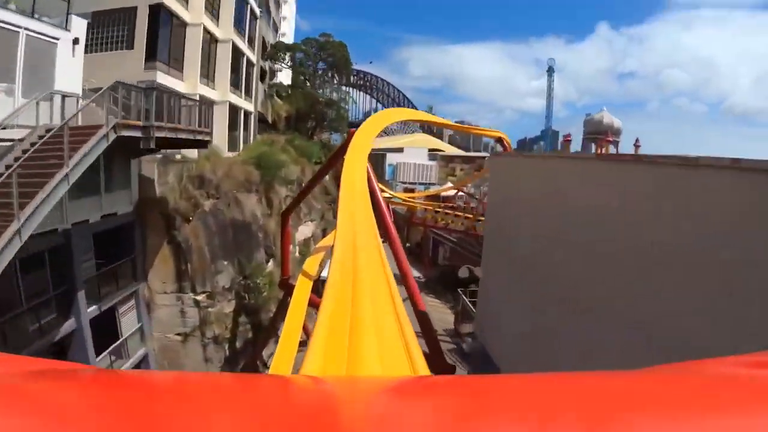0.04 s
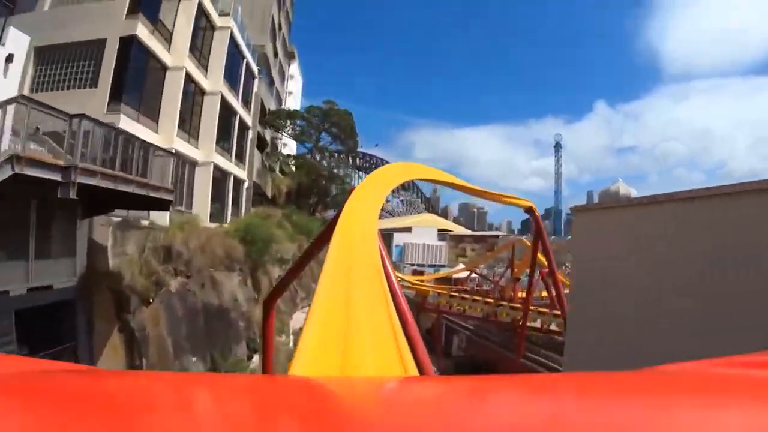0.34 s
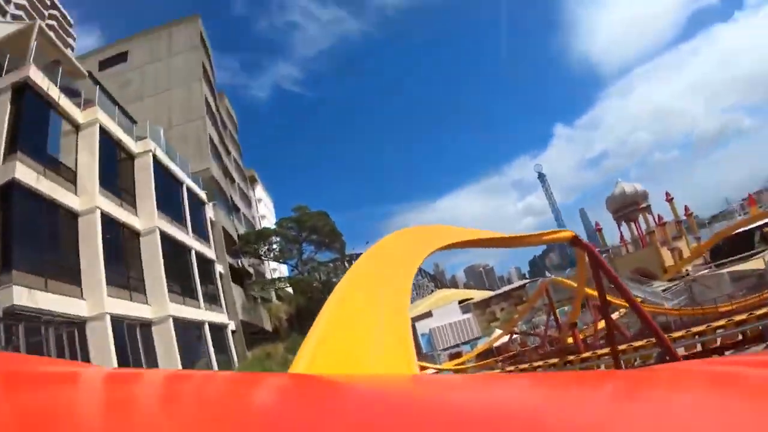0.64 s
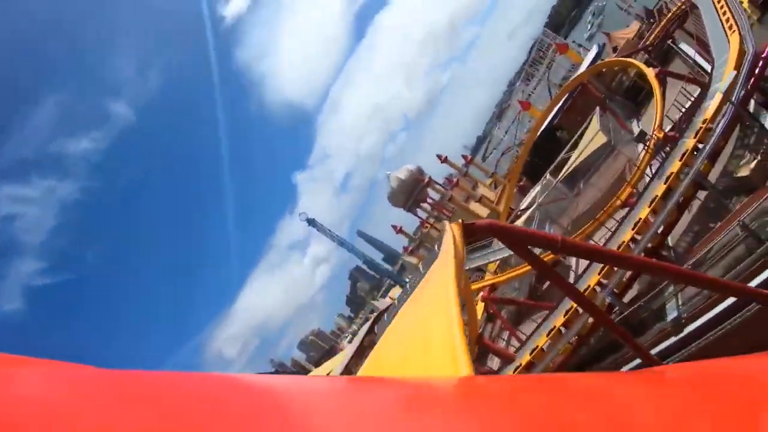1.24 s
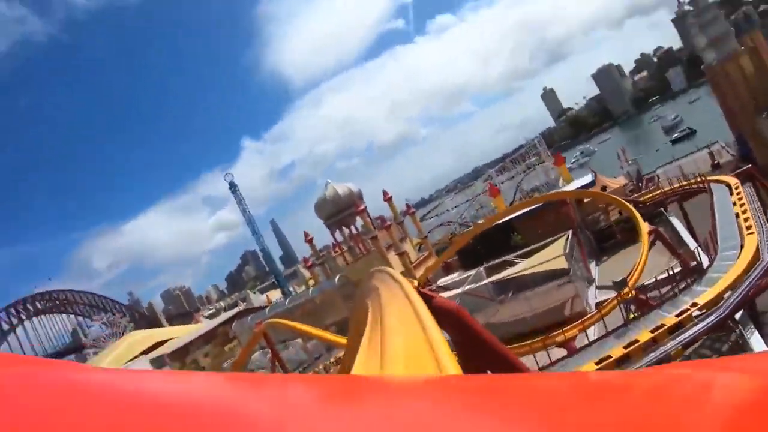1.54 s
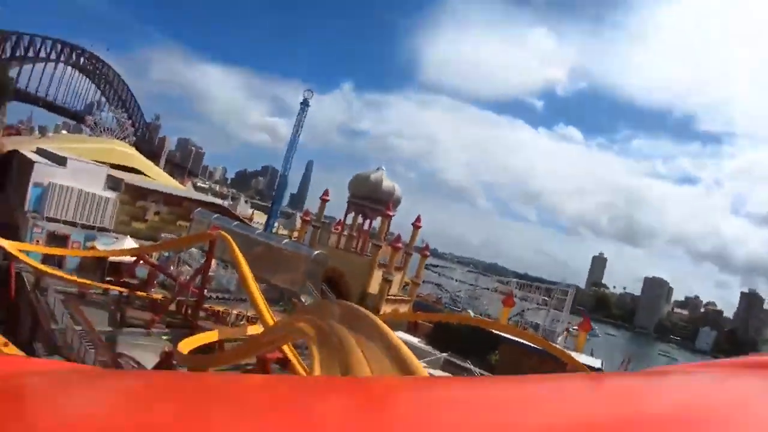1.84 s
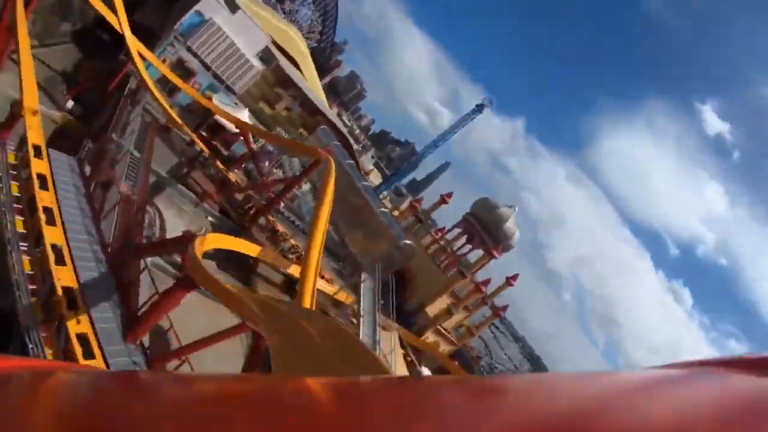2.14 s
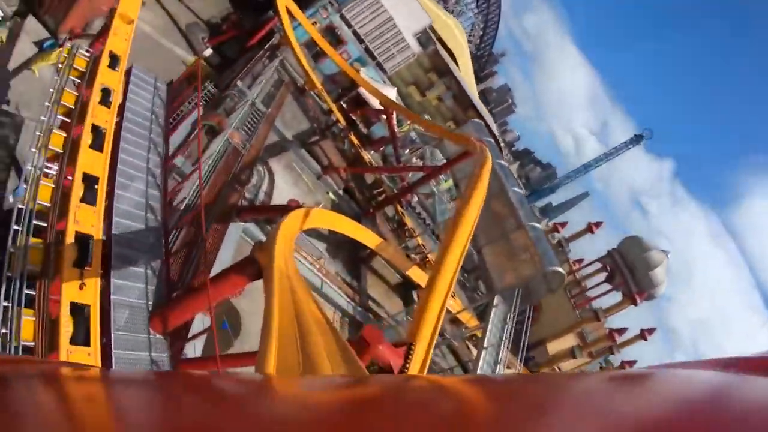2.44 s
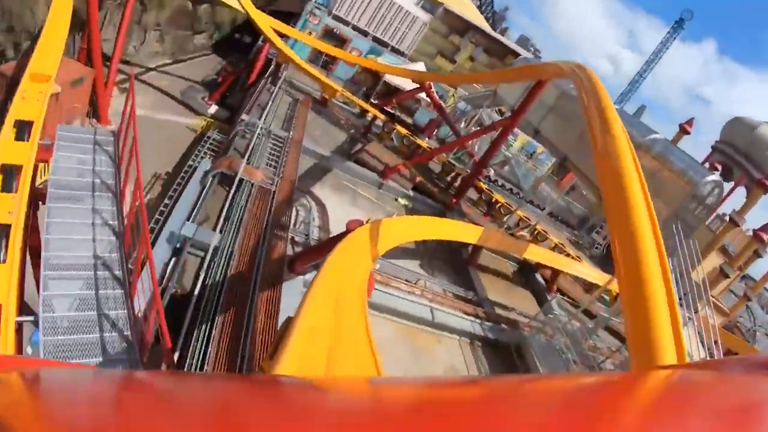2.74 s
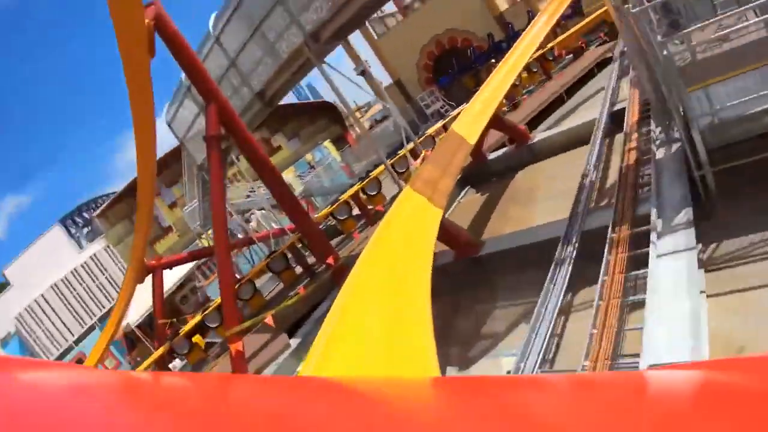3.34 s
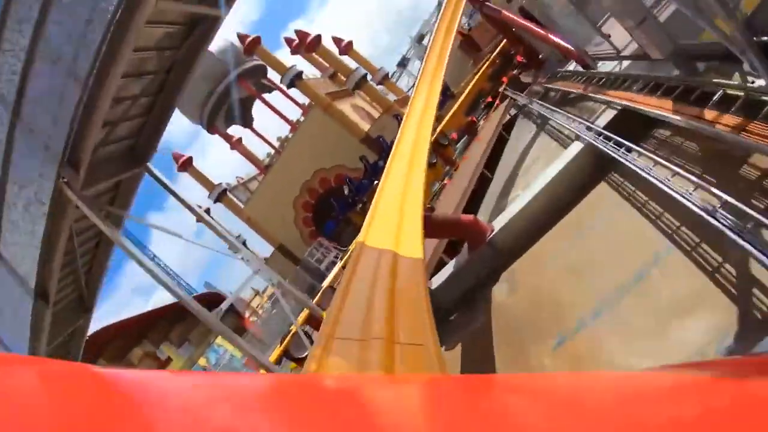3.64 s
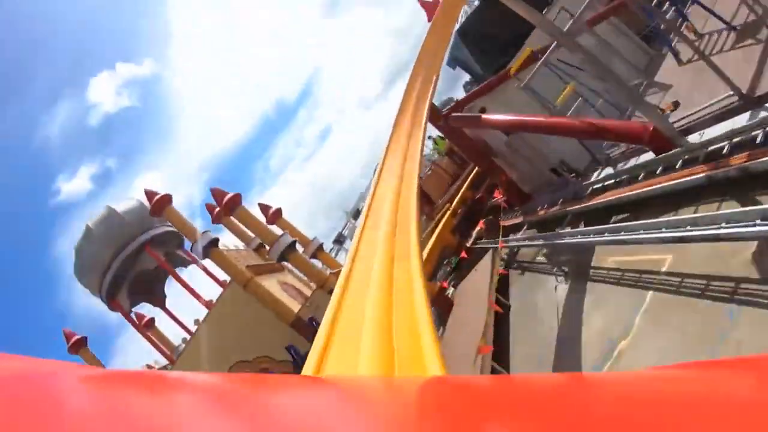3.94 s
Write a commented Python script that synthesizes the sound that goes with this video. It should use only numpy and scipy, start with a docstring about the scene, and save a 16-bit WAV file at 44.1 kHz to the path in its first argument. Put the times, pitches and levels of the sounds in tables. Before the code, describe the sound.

Deep, continuous wind buffets a microphone riding outdoors on a roller coaster's nose. The car drones and bumps over the track with a quieter wheel roar and hiss, while brief, light rattles come and go.

```python
"""Wind buffets a microphone on the nose of a roller coaster car running through banked turns.
Turbulent eddies make the rumble, gusts and slaps. The track drives the resonances of the hollow body,
which booms and thumps; the wheels roar and hiss on the rough rail. A loose fitting chatters in short
bursts of impacts, and a few thin ticks sound above it. A limiter holds the rumble down."""
import sys
import numpy as np
from scipy import signal
from scipy.fft import rfft, irfft
from scipy.io import wavfile
from scipy.ndimage import uniform_filter1d, minimum_filter1d

SR = 44100
rng = np.random.default_rng(int(sys.argv[2]) if len(sys.argv) > 2 else 0)


def wrap_up_sound(samples):
    """Save the sound to the file named by the first command line argument, as 16-bit audio."""
    columns = np.atleast_2d(samples).T
    # keep every value between -1 and 1, then stretch to whole-number steps
    tamed = np.clip(columns, -1, 1)
    steps = np.round(tamed * 32767).astype(np.int16)
    wavfile.write(sys.argv[1], SR, steps)


N = 176400


def wind():
    """Turbulent pressure fluctuation: large eddies rumble on the microphone, smaller ones flutter."""
    # envelopes of the rumble and of the low-mid and mid gusts (time [s], level [dB])
    rumble_levels = [(0, -13.5), (.27, -23.5), (.42, -17.5), (.72, -12.5), (.79, -18), (.83, -13),
                     (1.28, -11.5), (1.45, -16.5), (1.57, -15.5), (1.71, -18), (1.82, -17), (2.2, -16),
                     (2.45, -15), (2.68, -14), (3.32, -13), (3.54, -19.5), (3.58, -13.5), (3.73, -19.5),
                     (3.85, -9), (4, -23)]
    low_levels = [(0, -34), (.44, -37.5), (.5, -31.5), (.62, -42.5), (1.15, -34.5), (1.44, -32.5),
                  (1.53, -28.5), (1.8, -39.5), (1.95, -30.5), (2.08, -40), (2.16, -23.5), (2.27, -35),
                  (2.78, -37.5), (3.1, -33.5), (3.29, -25), (3.34, -32.5), (3.44, -24.5), (3.5, -29),
                  (3.6, -26.5), (3.75, -34), (4, -28)]
    mid_levels = [(0, -40.5), (.4, -46), (.9, -41.5), (1.44, -43.5), (1.54, -35), (1.68, -49), (1.76, -37),
                  (1.84, -42), (1.9, -31), (1.96, -36), (2.02, -30), (2.07, -34.5), (2.16, -29.5),
                  (2.21, -34.5), (2.26, -31.5), (2.4, -36), (2.48, -41), (2.95, -41), (3.25, -39.5),
                  (3.41, -36), (3.5, -41.5), (3.66, -37), (3.82, -34), (4, -48)]
    # spectra of the same three bands (frequency [Hz], spectral level [dB])
    rumble_spectrum = [(15, -18.5), (25, -13.5), (38, -8.5), (50, -4.5), (64, 1), (87, 2.5), (102, -7),
                       (150, -26.5), (400, -44)]
    low_spectrum = [(130, -20.5), (220, -5), (280, 2.5), (350, -1.5), (440, -15), (600, -20), (1200, -43.5)]
    mid_spectrum = [(250, -20.5), (390, 3.5), (490, 1.5), (620, -2.5), (800, -7.5), (1050, -17),
                    (1600, -22), (4000, -50.5)]
    rumble = steady(noise(rumble_spectrum), span_s=0.27) * envelope(rumble_levels)
    flutter = fluctuation(rate_hz=22)
    low = steady(noise(low_spectrum) * undb(1.5 * flutter), span_s=0.043) * envelope(low_levels)
    mid = steady(noise(mid_spectrum) * undb(2 * flutter), span_s=0.072) * envelope(mid_levels)
    return undb(2.5) * rumble + low + undb(-0.83) * mid


def wind_slaps():
    """Pressure transients: single eddies burst on the microphone."""
    # eddy arrivals (time [s], level [dB])
    eddies = [(1.543, -1.5), (1.641, -6), (2.156, 3.5), (3.533, 2), (3.646, 0.5)]
    air = resonant_noise([(304, 316, 0)], span_s=0.083)
    return undb(-20.5) * air * bursts(eddies, attack_s=0.0044, decay_s=0.01)


def body_boom():
    """Forced vibration: the track shakes the hollow body at random, and its resonances respond."""
    # body resonances (frequency [Hz], stage bandwidth [Hz], gain [dB])
    modes = [(124.4, 28.5, 1.5), (195.5, 51.7, -0.5), (325, 61, -15.5)]
    # envelopes of the lowest resonance and of the upper two (time [s], level [dB])
    boom_levels = [(0, -22), (.2, -21.5), (.4, -32), (.54, -10.5), (.64, -18), (.76, -25), (.83, -18.5),
                   (.96, -30), (1.15, -15), (1.26, -24), (1.39, -13), (1.65, -22.5), (1.75, -16.5),
                   (1.83, -26.5), (2.08, -20), (2.16, -17.5), (2.8, -21), (3.05, -22), (3.46, -19.5),
                   (3.55, -21), (3.64, -28), (3.73, -13.5), (3.86, -32), (4, -16.5)]
    drone_levels = [(0, -31.5), (.2, -33.5), (.42, -29.5), (.54, -27), (.72, -21), (.8, -27.5), (1.26, -25),
                    (1.42, -42), (1.54, -30.5), (1.9, -29.5), (2.24, -24.5), (2.66, -27), (3.1, -27.5),
                    (3.24, -22.5), (3.38, -20), (3.5, -32), (3.64, -31), (3.73, -20), (3.9, -28.5)]
    boom = resonant_noise(modes[:1], span_s=0.12) * envelope(boom_levels)
    drone = resonant_noise(modes[1:], span_s=0.11) * envelope(drone_levels)
    return undb(0.5) * boom + drone


def body_thumps():
    """Damped free vibration: the body rings down after each jolt from uneven track."""
    # jolts (time [s], level [dB])
    jolts = [(.488, -6.5), (.532, 0), (1.527, -2.5), (2.152, 0.5), (3.533, 5)]
    # body modes (frequency [Hz], 60 dB decay time [s], level [dB])
    modes = [(128.6, 0.17, -2), (199.5, 0.15, -5.5), (330.5, 0.085, -8)]
    return undb(-5) * struck(jolts, modes, contact_s=0.0094)


def wheels():
    """Roughness excitation: rolling contact with the rail modulates a roar and a hiss together."""
    # envelopes of the wheel roar and the rail hiss (time [s], level [dB])
    roar_levels = [(0, -50), (.15, -55), (.6, -46), (.73, -52.5), (.88, -45.5), (1.08, -52), (1.3, -44.5),
                   (1.44, -50.5), (1.56, -43), (1.7, -47.5), (2.2, -46.5), (2.57, -44), (2.78, -48),
                   (3.05, -48), (3.3, -44.5), (3.58, -49), (3.78, -42.5), (4, -46.5)]
    hiss_levels = [(0, -64.5), (.2, -69.5), (.5, -63), (.9, -59), (1.12, -58.5), (1.3, -58.5), (1.55, -56),
                   (1.7, -62.5), (2.3, -57.5), (2.6, -58), (2.78, -59.5), (3.05, -59), (3.3, -57),
                   (3.75, -56), (4, -59)]
    # their spectra (frequency [Hz], spectral level [dB])
    roar_spectrum = [(400, -23), (800, 3.5), (1100, 1), (1450, 1.5), (1850, -2), (2300, -4), (2800, -6.5),
                     (3600, -12.5), (4200, -14), (6000, -45)]
    hiss_spectrum = [(2500, -10.5), (3700, 2), (4200, -7), (4700, -1), (5600, -3.5), (6500, -5.5),
                     (7200, -11.5), (8000, -21.5), (9500, -29.5), (12000, -44.5)]
    roughness = undb(1.05 * fluctuation(rate_hz=40))
    roar = undb(2) * noise(roar_spectrum) * envelope(roar_levels)
    hiss = undb(3) * noise(hiss_spectrum) * envelope(hiss_levels)
    return roughness * (roar + hiss)


def loose_fitting():
    """Impact excitation: knocks, clacks and faint random chatter ring the modes of a loose fitting."""
    # knocks (time [s], level [dB], treble offset [dB])
    knocks = [(0.208, -13, -6), (1.112, -6, -3), (1.199, -9, 5), (1.235, -10.5, 4.5), (1.329, -1.5, 3),
              (1.345, -6, 7), (1.352, -4.5, -4), (1.362, -4, 6.5), (1.590, -7, -8), (2.249, -3.5, -6),
              (2.330, -6, -2), (2.838, -5.5, -6), (2.861, -4.5, 1), (3.258, -17, 14), (3.280, -7, -1.5),
              (3.293, -3.5, 8), (3.309, -1.5, 2.5), (3.356, -0.5, -1.5), (3.370, -2, 2), (3.377, 0, -6),
              (3.385, -2, -6), (3.452, -6, 1), (3.468, -14, -4), (3.482, -4.5, -6), (3.8536, 6, -2),
              (3.8695, 4.5, -2), (3.883, -2, 0), (3.899, -9, -2)]
    # harder clacks of metal on metal (time [s], level [dB])
    clack_hits = [(0.209, -16), (1.346, -5), (1.352, -2.5), (1.362, -6), (3.377, -5.5)]
    # envelope of the chatter between knocks (time [s], level [dB])
    chatter_levels = [(0, -30.5), (1.1, -27), (1.35, -20.5), (1.7, -15), (3.1, -20), (3.35, -14),
                      (3.62, -12), (3.85, -6), (4, -20.5)]
    # broad resonances of the fitting (frequency [Hz], stage bandwidth [Hz], gain [dB])
    low_modes = [(1796, 620, 2), (3640, 1200, -20.5)]
    high_modes = [(4800, 210, -0.5), (5440, 1100, -2.5), (6070, 800, -2)]
    clack_modes = [(3050, 1700, 2), (3850, 340, 1.8)]
    # its clear notes (frequency [Hz], 60 dB decay time [s], level [dB])
    ping_modes = [(1790, 0.018, 2), (2066, 0.026, -5.5)]
    attack_s, decay_s, taps_per_s = 0.001, 0.0028, 60
    when, strength = rng.random((int(taps_per_s * N / SR), 2)).T
    taps = zip(when * N / SR, -0.8 * np.log(np.maximum(strength, 0.05)))
    chatter = bursts(taps, attack_s, decay_s) * envelope(chatter_levels)
    low_hits = [(time, db) for time, db, _ in knocks]
    high_hits = [(time, db + treble_db) for time, db, treble_db in knocks]
    low = resonant_noise(low_modes) * (chatter + undb(-4.5) * bursts(low_hits, attack_s, decay_s))
    pings = struck(low_hits, ping_modes, contact_s=attack_s)
    high = resonant_noise(high_modes) * (undb(-7.5) * chatter + bursts(high_hits, attack_s, decay_s))
    clacks = resonant_noise(clack_modes) * bursts(clack_hits, attack_s, decay_s=0.0017)
    rattle = undb(-29.5) * low + undb(-39.5) * high + undb(-29) * pings + undb(-33) * clacks
    return signal.sosfilt(signal.butter(4, 7000, fs=SR, output="sos"), rattle)


def ticks():
    """Amplitude modulation: very short pulses of treble noise are heard as thin ticks in a brief fizz."""
    # tick onsets and the envelope of the fizz (time [s], level [dB])
    onsets = [(1.563, -2), (1.574, 2), (1.579, 0), (1.611, 0)]
    fizz_levels = [(1.53, -105), (1.565, -77), (1.63, -74), (1.69, -108)]
    pulses = undb(-54) * bursts(onsets, attack_s=0.00033, decay_s=0.0006)
    return resonant_noise([(10400, 5000, 0)]) * (pulses + envelope(fizz_levels))


def undb(db):
    """Amplitude ratio of a level in decibels."""
    return 10 ** (np.asarray(db) / 20)


def unit(x):
    """Normalisation to rms 1."""
    return x / np.sqrt(np.mean(x ** 2))


def steady(x, span_s):
    """Division by the running rms evens out swells slower than the span."""
    return x / np.sqrt(uniform_filter1d(x ** 2, int(span_s * SR)) + 1e-9)


def envelope(rows):
    """Amplitude envelope interpolated through (time [s], level [dB]) rows."""
    return undb(np.interp(np.arange(N) / SR, *np.array(rows).T))


def noise(spectrum):
    """Spectral shaping: noise of rms 1 that rolls off beyond both ends of the given spectrum."""
    hz, db = np.array(spectrum).T
    f = np.maximum(np.fft.rfftfreq(N, 1 / SR), 1)
    gain = undb(np.interp(np.log(f), np.log(hz), db))
    roll_off = np.minimum(f / hz[0], 1) / np.maximum(f / hz[-1], 1) ** 2
    return unit(irfft(rfft(rng.standard_normal(N)) * gain * roll_off, N))


def fluctuation(rate_hz):
    """Low-pass noise: smooth random motion of rms 1."""
    f = np.fft.rfftfreq(N, 1 / SR)
    return unit(irfft(rfft(rng.standard_normal(N)) * np.exp(-(f / rate_hz) ** 2), N))


def resonant_noise(modes, span_s=0.011):
    """Resonance: noise drives two identical band-pass stages per mode; the sum is held near rms 1."""
    drive, out = rng.standard_normal(N), 0
    for hz, width, db in modes:
        b, a = signal.iirpeak(hz, hz / width, fs=SR)
        out = out + undb(db) * signal.lfilter(b, a, signal.lfilter(b, a, drive))
    return steady(out, span_s)


def bursts(blows, attack_s, decay_s):
    """Transient envelopes: a linear rise and exponential decay for each (time [s], level [dB]) blow."""
    t, out = np.arange(SR // 10) / SR, np.zeros(N + SR)
    shape = np.minimum(t / attack_s, np.exp(-np.maximum(t - attack_s, 0) / decay_s))
    for start, db in blows:
        i = int(start * SR)
        out[i:i + len(t)] += undb(db) * shape
    return out[:N]


def struck(blows, modes, contact_s):
    """Modal superposition: each blow starts damped sinusoids; longer contact softens the onset."""
    t, out = np.arange(SR // 4) / SR, np.zeros(N + SR)
    hz, t60, mode_db = np.array(modes).T[:, :, None]
    decay = np.exp(-np.log(1000) * t / t60)
    for start, db in blows:
        i = int(start * SR)
        detune = 1 + 0.012 * rng.standard_normal(hz.shape)
        notes = undb(db + mode_db) * decay * np.sin(2 * np.pi * hz * detune * t)
        out[i:i + len(t)] += notes.sum(0) * np.minimum(t / contact_s, 1)
    return out[:N]


def scene():
    """Superposition: the pressures of all sources add at one microphone."""
    return (wind() + wind_slaps() + body_boom() + body_thumps() + wheels() + loose_fitting() + ticks())[None]


def record(dry):
    """Peak limiting: a smoothed gain dips just ahead of each peak; a low-pass then cuts the top treble."""
    ceiling_db, knee, cutoff_hz = -5.5, 2.18, 15700
    hold = int(0.007 * SR)
    wanted = (1 + (np.abs(dry) / undb(ceiling_db)) ** knee) ** (-1 / knee)
    held = minimum_filter1d(wanted, 2 * hold)
    gain = uniform_filter1d(uniform_filter1d(held, hold), hold)
    return signal.sosfilt(signal.ellip(8, 0.2, 70, cutoff_hz, fs=SR, output="sos"), dry * gain)


dry = scene()
out = record(dry)
wrap_up_sound(out)
```